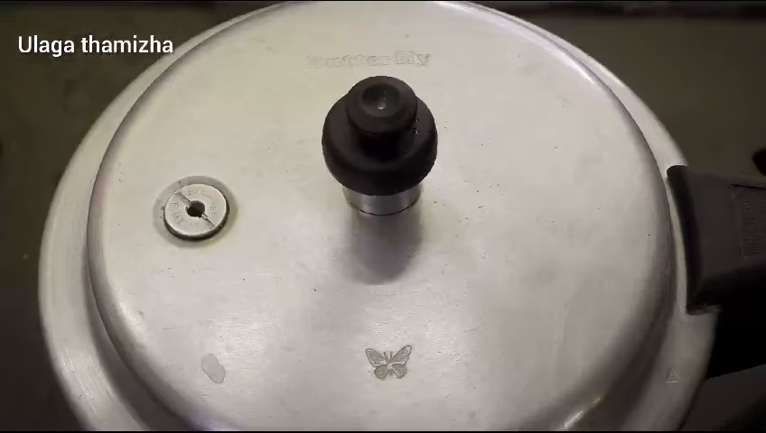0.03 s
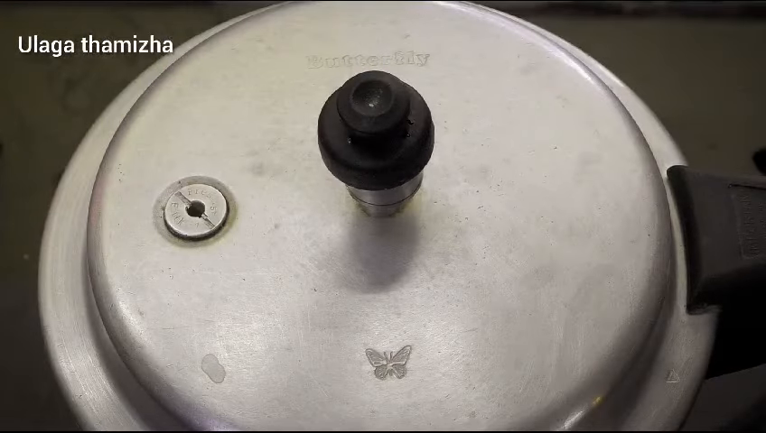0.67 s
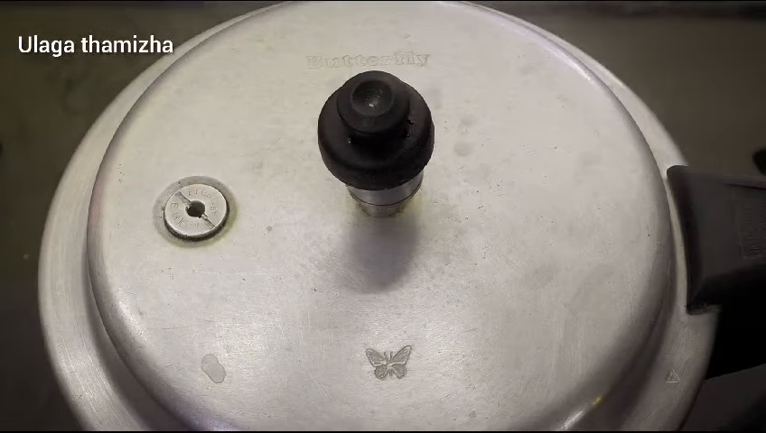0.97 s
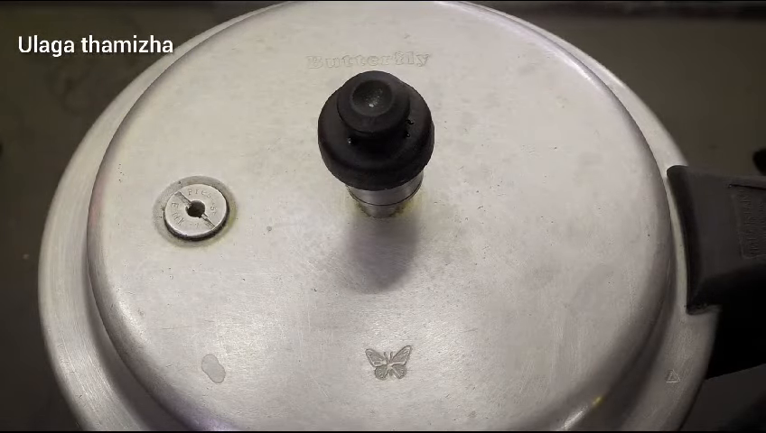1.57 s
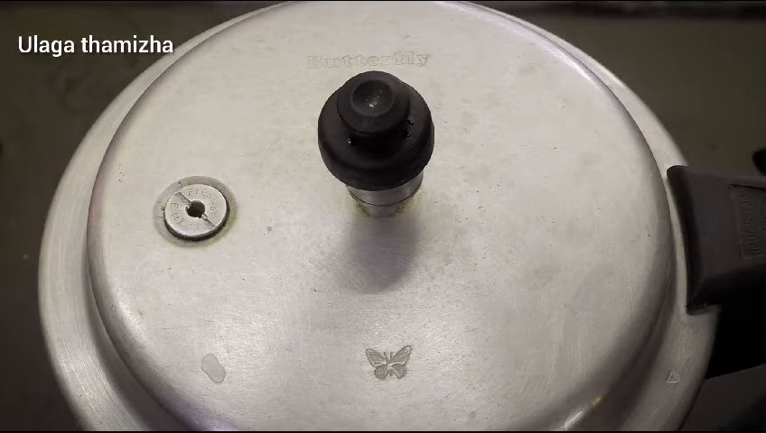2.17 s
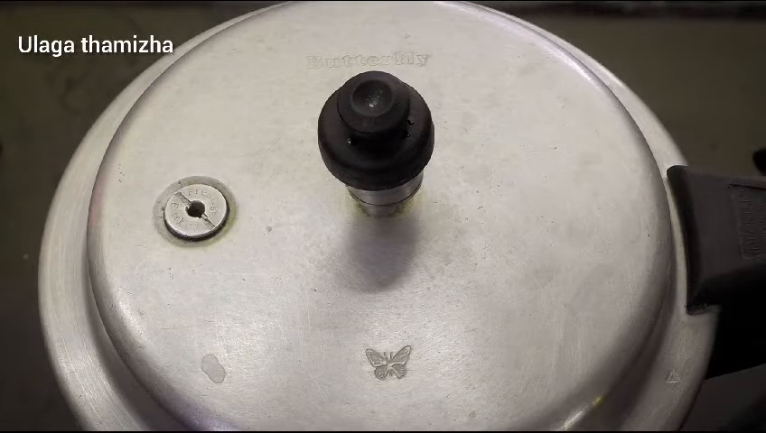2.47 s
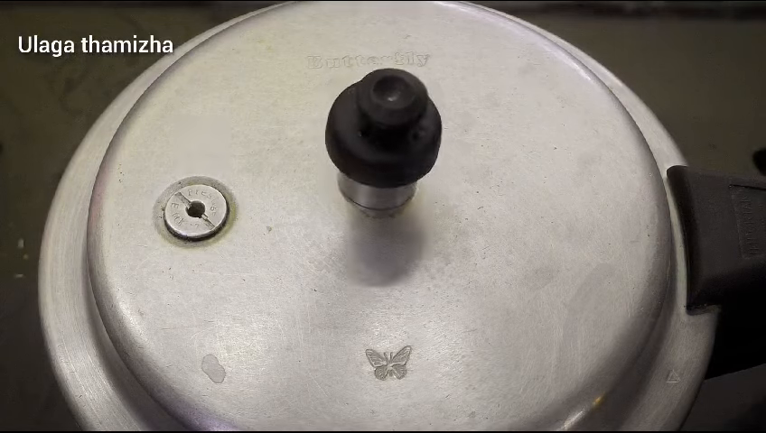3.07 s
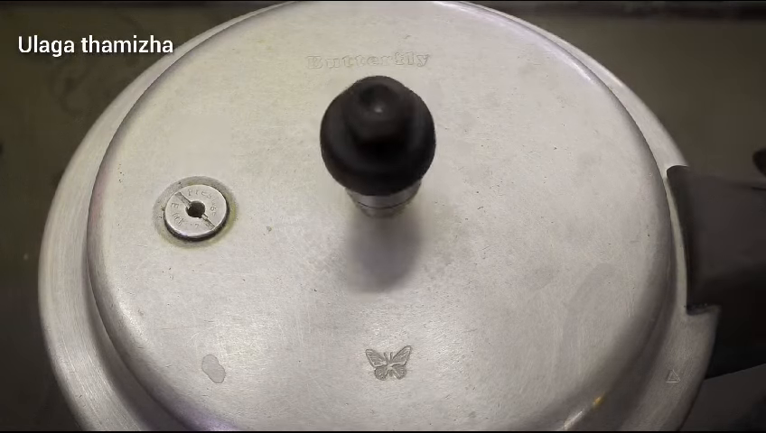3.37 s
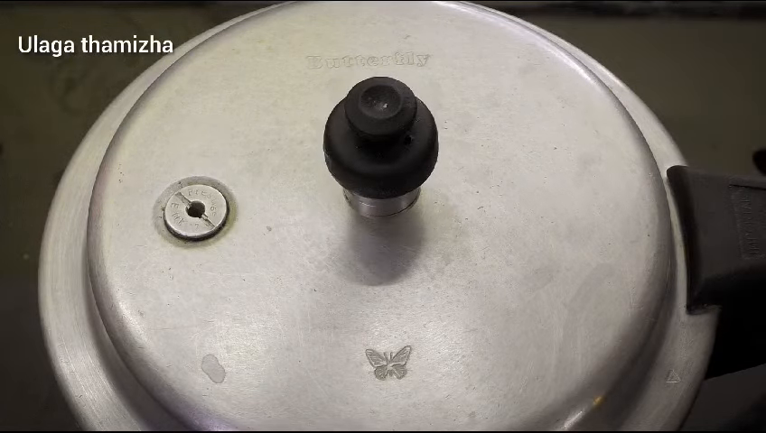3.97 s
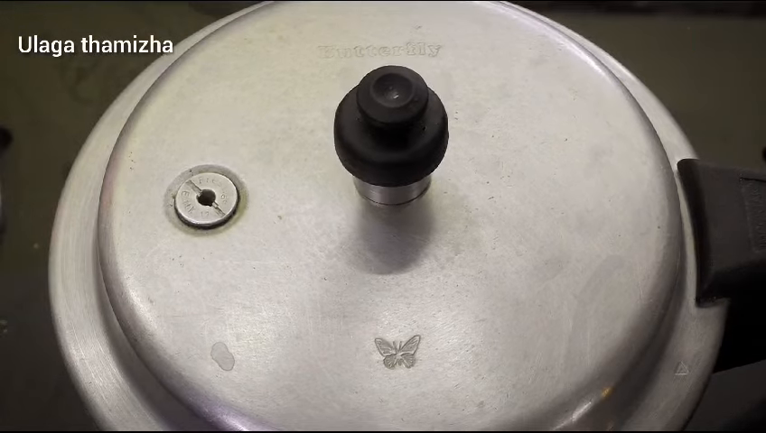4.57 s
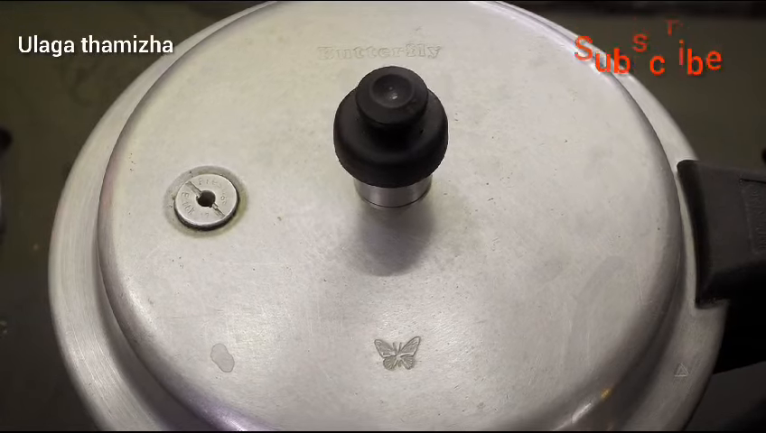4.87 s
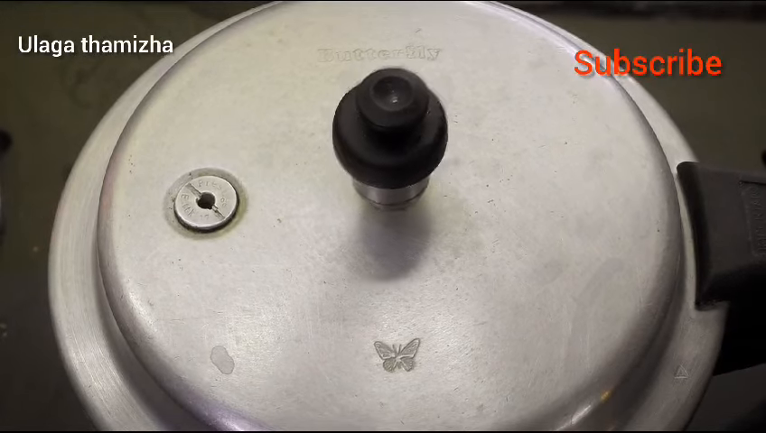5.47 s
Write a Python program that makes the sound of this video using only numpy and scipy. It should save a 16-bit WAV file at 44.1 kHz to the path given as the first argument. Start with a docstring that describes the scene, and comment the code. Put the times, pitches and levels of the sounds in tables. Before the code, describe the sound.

A pressure cooker sputters, blows a loud steady hiss of steam, shuts off briefly, then sputters and hisses again.

```python
"""Pressure cooker blowing off steam

Just above the lid, the weight on the vent sputters, lifts into a full hissing jet, then drops
shut with a hollow chuff and a faint ring. A thin leak builds, the weight sputters again over
a low fluttering rumble, and the jet returns. A small kitchen reflects the steam."""
import sys
import numpy as np
from scipy import signal
from scipy.fft import rfft, irfft
from scipy.io import wavfile

SR = 44100
rng = np.random.default_rng(int(sys.argv[2]) if len(sys.argv) > 2 else 0)


def to_wav(sig):
    """Store sig (one row per channel, or 1-D mono) as 16-bit WAV at the path in sys.argv[1].

    Samples outside -1..1 are clipped; the rate is SR.
    """
    pcm = np.clip(np.atleast_2d(sig), -1, 1) * 32767
    pcm = np.round(pcm).astype(np.int16)
    wavfile.write(sys.argv[1], SR, pcm.T)  # frames by channels


N = 248045
TIME = np.arange(N) / SR
FFT_SIZE = 2 ** 18
FREQS = np.fft.rfftfreq(FFT_SIZE, 1 / SR)

# hollow chuffs as the weight jumps or drops: peak t/s, length/s, level/dB, cavity f/Hz
CHUFF_HITS = [(.02, .022, -33, 520), (.034, .004, -20.5, 200), (.275, .012, -32, 380),
              (.631, .012, -27, 1070), (.66, .012, -42, 1050), (3.638, .024, -36, 850),
              (3.656, .018, -43, 1350), (3.668, .05, -50, 160), (5.539, .012, -31, 1070)]
# dull colour of a chuff: f/Hz, level/dB
CHUFF_EQ = [(60, 2), (200, 1), (500, -3), (800, -2), (1150, -1), (1600, -6), (2600, -6), (5000, -23),
            (15000, -45)]
# the weight sputters on its seat: start t/s, end t/s, hiss level/dB, rumble level/dB
SPUTTER_SPANS = [(0.025, 0.552, -28, -32), (4.267, 5.448, -27, -29.5)]
# spurts as it hops: peak t/s, span/s (a spurt fills 0.77 of it), level/dB ahead of the low shelf
HOP_SPURTS = [(.033, 0.0087, -18.5), (.099, .044, -21.5), (0.191, 0.084, -16.5), (.295, 0.058, -20),
              (0.374, 0.058, -18), (0.461, 0.044, -18.5), (4.381, 0.054, -23.5), (4.443, 0.043, -21),
              (4.505, 0.039, -27), (4.894, 0.03, -26), (4.99, 0.06, -24.5), (5.045, 0.045, -24.5),
              (5.142, 0.055, -20.5), (5.205, 0.04, -18.5), (5.299, 0.076, -18.5), (5.383, 0.054, -22)]
# colour of steam squeezed under the weight: f/Hz, level/dB
SPUTTER_EQ = [(350, -43), (600, -18.5), (767, -4), (880, -9), (1540, -10.5), (2170, -8), (3540, -8),
              (3950, -2), (5410, -4.5), (6120, 1.5), (7510, -4), (8260, 2), (11500, -4), (13700, -5),
              (15700, -6.5)]
# peaks and notches of that narrow gap: f/Hz, width/Hz, gain/dB
GAP_RESONANCES = [(2147, 43, 7.5), (2770, 380, 2.5), (3630, 310, -6.5), (4270, 270, -5.5),
                  (5380, 340, -2.5), (6330, 42, 6), (6630, 200, 3), (6990, 140, 4), (7330, 370, 1.5),
                  (8000, 200, 2), (8850, 200, -2.5), (9180, 230, 4.5), (10500, 200, 0.5), (13300, 500, 6),
                  (15000, 900, -11)]
# swells of throbbing air under the sputter: peak t/s, length/s, level/dB
THROB_SWELLS = [(0.093, 0.24, -18.5), (0.295, 0.14, -21), (0.439, .19, -17), (4.33, .06, -34),
                (4.53, 0.07, -30), (4.777, 0.26, -19), (5.07, 0.13, -24), (5.224, .08, -21.5),
                (5.4, 0.096, -21.5)]
# colour of the buffeting air: f/Hz, level/dB
RUMBLE_EQ = [(20, 4.5), (45, 5.5), (70, -3.5), (110, -3.5), (200, -11), (330, -8.5), (450, -15.5),
             (620, -24), (900, -30), (1800, -26), (5000, -29)]
# full jets with the weight lifted: lift t/s, rise/s, drop t/s, level/dB, opening roar boost/dB
JET_BLOWS = [(.526, .006, 3.594, -16, 7), (5.427, 0.042, 5.7, -15.5, 1)]
# bright colour of the full jet: f/Hz, level/dB
JET_EQ = [(100, -31.5), (250, -28), (600, -24), (1700, -18.5), (2300, -14.5), (3400, -13), (4100, -6.5),
          (5300, -8), (6300, -2.5), (8500, 0.5), (10800, -1.24), (13000, -4), (14500, -3.5), (15600, -11)]
# peaks and notches of vent, weight and lid: f/Hz, width/Hz, gain/dB
VENT_RESONANCES = [(781, 44, 6.7), (1093, 35, 3.6), (1347, 35, 6.0), (1972, 67, 5.2), (2172, 78, 7.6),
                   (2658, 120, 8.0), (4424, 40, 4.9), (4483, 51, -5.3), (4737, 42, 4.7), (5682, 99, 2.9),
                   (6123, 53, 6.6), (6359, 35, 3.1), (6941, 53, 8.4), (7160, 64, 6.2), (7596, 156, -5.3),
                   (8042, 250, 4.3), (8208, 35, 2.6), (8386, 114, 5.0), (8832, 91, 4.3), (9079, 140, 5.7),
                   (9396, 35, 1.7), (9584, 54, 5.1), (9807, 37, 3.6), (10061, 72, 4.8), (10683, 35, 3.3),
                   (11447, 123, 4.6), (11898, 69, 5.4), (12181, 193, 6.4), (12771, 250, 5.6),
                   (13302, 159, 4.5)]
# the weight rocks on the weakening jet: peak t/s, length/s, jet gain/dB, hollow ring gain/dB
WEIGHT_ROCKS = [(2.932, .2, -0.9, -0.8), (3.082, 0.12, -2, 3.5), (3.2, 0.13, 0.2, 3), (3.45, 0.26, -1, 4)]
# metal modes of the landing weight: f/Hz, level/dB, t60/s
WEIGHT_MODES = [(872, -54, .45), (935, -56, .45), (2326, -57, .45), (2519, -59, .6)]
# colour of the thin leak: f/Hz, level/dB
LEAK_EQ = [(200, -5), (700, 0), (1100, -7), (1700, -7), (2300, -4), (3500, -20), (4500, -3.5), (5400, -8),
           (6600, 0.5), (8300, 2.5), (9400, 0.5), (10300, -3.5), (13000, -3), (15700, -4)]
# reverb time of the kitchen: f/Hz, t60/s
KITCHEN_DECAY = [(200, 0.96), (1000, 0.47), (3000, 0.56), (8000, 0.46), (15000, 0.19)]
# colour of the low room tone: f/Hz, level/dB
ROOM_TONE_EQ = [(20, 0), (45, -0.5), (70, -1), (110, -3.5), (160, -11.5), (220, -48), (450, -20),
                (1000, -30), (3500, -34), (15000, -33)]

CRACK_S = 0.003  # the seal cracks open at once
SETTLE_DB_PER_S = 170  # the sputter dies as the weight lifts clear
SHUT_DB_PER_S = 288  # the dropping weight chokes the jet; the leak cuts off as fast


def amp(db):
    """Decibels to gain."""
    return 10 ** (np.asarray(db) / 20)


def unit(x):
    """Scales to rms 1."""
    return x / np.sqrt(np.mean(x ** 2) + 1e-20)


def curve(points, hz):
    """Reads a table on a log-frequency axis."""
    f, value = np.transpose(points)
    return np.interp(np.log(hz + 1), np.log(f + 1), value)


def noise(gain):
    """Noise of rms 1, shaped by a gain for each frequency."""
    real, imaginary = rng.standard_normal((2, len(FREQS)))
    return unit(irfft((real + 1j * imaginary) * gain)[:N])


def turbulence(eq, resonances=()):
    """Noise with a broad colour and narrow resonances."""
    db = curve(eq, FREQS)
    for hz, width, peak_db in resonances:
        db += peak_db / (1 + (2 * (FREQS - hz) / width) ** 2)
    return noise(amp(db))


def waver(rate_hz):
    """Random motion of rms 1, rolling off above the given rate."""
    return noise(FREQS / (FREQS + rate_hz / 10) / np.hypot(1, (FREQS / rate_hz) ** 2))


def lowpass(x, edge_hz):
    """The part of a sound under a soft edge."""
    return irfft(rfft(x, FFT_SIZE) / (1 + (FREQS / edge_hz) ** 8))[:N]


def burst(peak_s, length_s):
    """A short, round-topped envelope of height 1."""
    return np.exp(-(np.abs(TIME - peak_s) / (length_s / 2)) ** 3)


def valve(start, rise_s, end, fall_db_per_s):
    """Envelope of a valve: a straight attack, a hold, and a release after the end."""
    return np.clip((TIME - start) / rise_s, 0, 1) * amp(-fall_db_per_s * np.maximum(TIME - end, 0))


def wet_flutter(sway_db, sway_hz, spit_db, spit_hz):
    """Gain of a wet steam flow: it sways with the weight, and droplets roughen it."""
    return unit(amp(sway_db * waver(sway_hz) + spit_db * waver(spit_hz)))


def turning(x, echo_db, max_turn_hz, longest_s, count):
    """The weight turns and aims its jets at different surfaces, so near echoes come and go."""
    out = x.copy()
    for delay, speed, phase in rng.random((count, 3)):
        aim = np.sin(2 * np.pi * (max_turn_hz * speed * TIME + phase))
        out += amp(echo_db) * aim * np.roll(x, int(delay * longest_s * SR))
    return unit(out)


def chuffs():
    """A sudden move of the weight pushes a puff of steam through its cavity."""
    out = np.zeros(N)
    for peak_s, length, db, cavity_hz in CHUFF_HITS:
        puff = turbulence(CHUFF_EQ, resonances=[(cavity_hz, 130, 13)])
        out += amp(db) * np.sqrt(burst(peak_s, length)) * puff
    return out


def sputter():
    """Steam squeezes under the weight, and each hop frees a brighter spurt."""
    flow = sum(amp(db) * valve(start, CRACK_S, end, SETTLE_DB_PER_S)
               for start, end, db, _ in SPUTTER_SPANS)
    hiss = turbulence(SPUTTER_EQ, GAP_RESONANCES)
    hiss = turning(hiss, echo_db=-15, max_turn_hz=0.42, longest_s=0.008, count=8)
    spurt_power = sum(amp(db) ** 2 * burst(t, 0.77 * span) for t, span, db in HOP_SPURTS)
    spurts = turbulence(SPUTTER_EQ, GAP_RESONANCES)
    spurts -= 0.37 * lowpass(spurts, edge_hz=3800)  # low shelf thins the body
    steam = hiss * flow + spurts * np.sqrt(spurt_power)
    return steam * wet_flutter(sway_db=1.2, sway_hz=49, spit_db=0.15, spit_hz=700)


def buffeting():
    """Air moved by the sputter and the leak throbs, each throb carrying a gust of rumble."""
    throb_hz = 30.06 * (1 + 0.03 * waver(15))
    throb = np.sin(2 * np.pi * (np.cumsum(throb_hz) / SR + rng.random()))
    swell = np.sqrt(sum(amp(db) ** 2 * burst(t, length) for t, length, db in THROB_SWELLS))
    draught = sum(amp(db) * valve(start, CRACK_S, end, SETTLE_DB_PER_S)
                  for start, end, _, db in SPUTTER_SPANS)
    airflow = np.hypot(draught, amp(-14.5) * swell) + amp(-1.5) * leak_flow()
    rumble = turbulence(RUMBLE_EQ) * airflow * amp(2.0 * waver(33) + 0.47 * throb)
    return rumble + np.sqrt(2) * throb * (swell + amp(2.5) * leak_flow())


def jet():
    """The full jet rings the vent: a roaring surge, then a sag in which the weight's hollow stands out."""
    steam = turbulence(JET_EQ, VENT_RESONANCES)
    steam = turning(steam, echo_db=-22, max_turn_hz=0.31, longest_s=0.014, count=10)
    roar = lowpass(steam, edge_hz=1800)
    hollow = lowpass(steam - roar, edge_hz=3260)
    rocking_db = sum(db * burst(t, length) for t, length, db, _ in WEIGHT_ROCKS)
    ring_db = 1.35 + sum(db * burst(t, length) for t, length, _, db in WEIGHT_ROCKS)
    surge_s, surge_db, sag_db_per_s = 0.14, 0.5, 1.02
    out = np.zeros(N)
    for lift, rise_s, drop, db, roar_db in JET_BLOWS:
        age = np.maximum(TIME - lift, 0)
        surge = np.exp(-(age / surge_s) ** 4)
        sag_db = sag_db_per_s * age - rocking_db  # pressure falls while the jet blows
        roar_boost = (amp(roar_db * surge) - 1) * roar
        hollow_boost = (amp(ring_db + 0.36 * sag_db) - 1) * hollow
        envelope = amp(db + surge_db * surge - sag_db) * valve(lift, rise_s, drop, SHUT_DB_PER_S)
        out += (steam + roar_boost + hollow_boost) * envelope
    return out * wet_flutter(sway_db=1.11, sway_hz=51.4, spit_db=-0.4, spit_hz=890)


def landing_ring(land_s):
    """The weight rings faintly as it lands on the vent tube."""
    age = np.maximum(TIME - land_s, 0)
    return sum(amp(db - 60 * age / t60) * np.sin(2 * np.pi * hz * age) for hz, db, t60 in WEIGHT_MODES)


def leak_flow(start_s=3.64, end_s=4.268, top_db=-46.5, growth_db_per_s=22.5):
    """Envelope of the leak: it grows with the pressure under the shut weight until the seal cracks."""
    level_db = top_db + growth_db_per_s * np.minimum(TIME - end_s, 0)
    return amp(level_db) * valve(start_s, CRACK_S, end_s, SHUT_DB_PER_S)


def leak():
    """A thin, spitting hiss slips past the shut weight."""
    hiss = turbulence(LEAK_EQ) * leak_flow()
    return hiss * wet_flutter(sway_db=1.0, sway_hz=39.8, spit_db=1.5, spit_hz=800)


def kitchen(x):
    """Dense reflections of a small room, the treble dying first."""
    reflections = rng.standard_normal(SR // 2) * (TIME[:SR // 2] > 0.005)  # 5 ms pre-delay
    hz, t, bands = signal.stft(reflections, SR, nperseg=256)
    decay = amp(-60 * t / curve(KITCHEN_DECAY, hz)[:, None])
    _, tail = signal.istft(bands * decay, SR)
    return signal.fftconvolve(x, tail / np.linalg.norm(tail))[:N]


def scene():
    """The cooker in its kitchen over quiet room tone, the same in both ears."""
    cooker = jet() + sputter() + leak() + chuffs() + landing_ring(land_s=3.635)
    mono = cooker + amp(-14) * kitchen(cooker) + buffeting() + amp(-56) * turbulence(ROOM_TONE_EQ)
    return np.array([mono, mono])


def record(dry):
    """A steep high cut takes the very top off the hiss."""
    high_cut = signal.firwin(1023, cutoff=15800, window=("kaiser", 9), fs=SR)
    return signal.oaconvolve(dry, high_cut[None], "same", axes=1)


dry = scene()
out = record(dry)
to_wav(out)
```